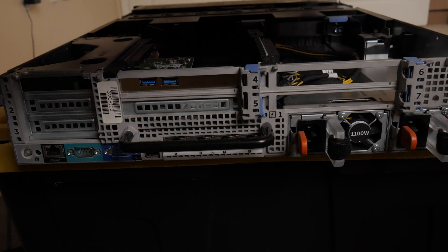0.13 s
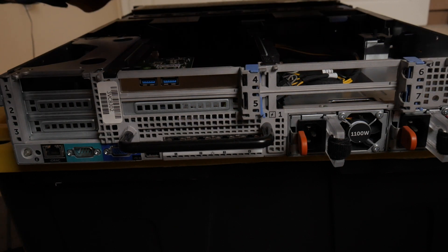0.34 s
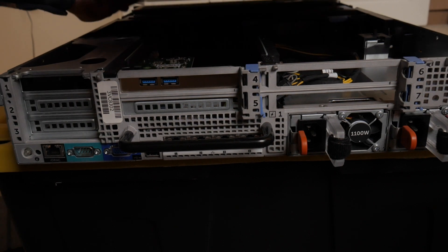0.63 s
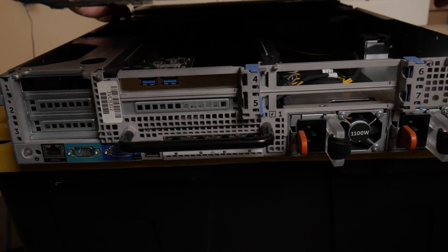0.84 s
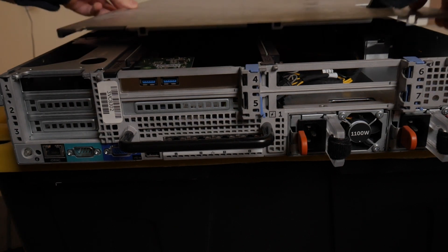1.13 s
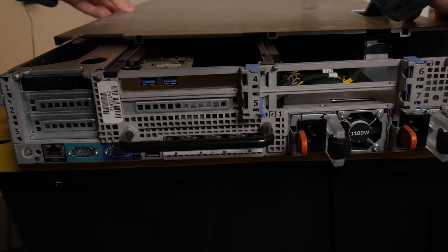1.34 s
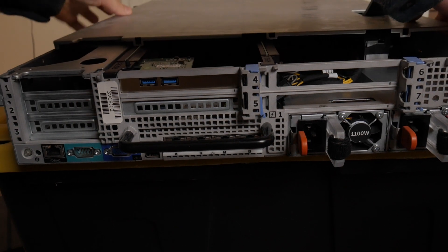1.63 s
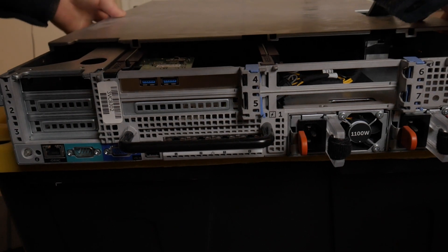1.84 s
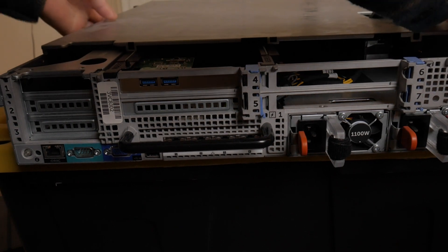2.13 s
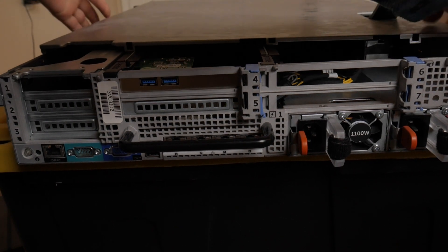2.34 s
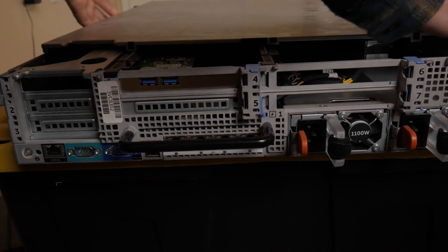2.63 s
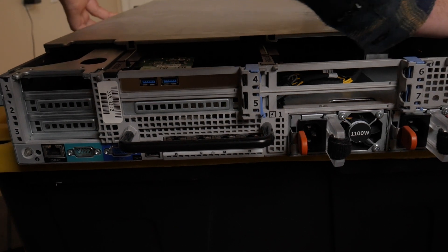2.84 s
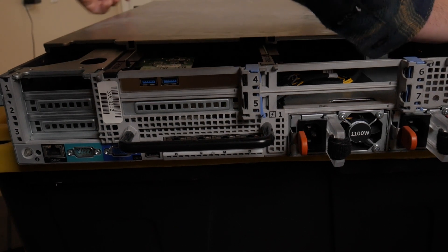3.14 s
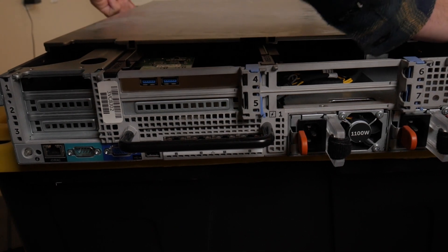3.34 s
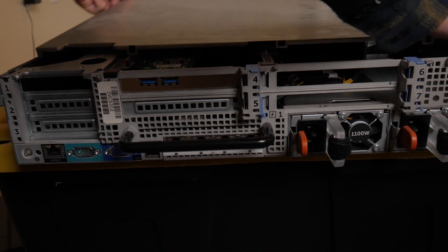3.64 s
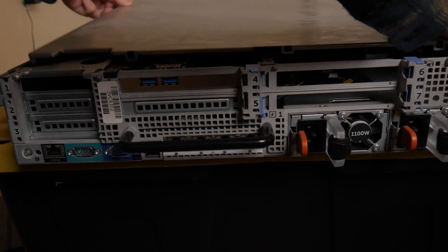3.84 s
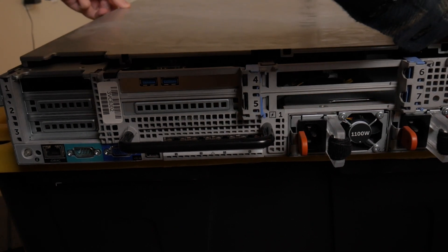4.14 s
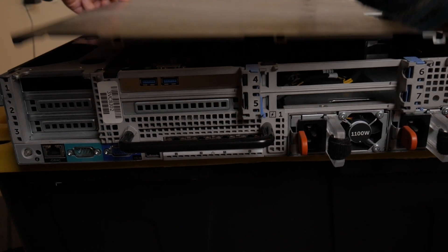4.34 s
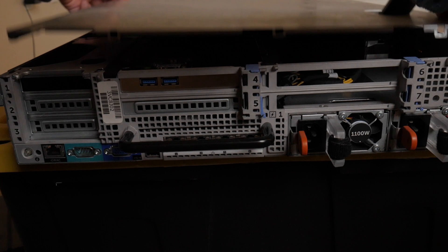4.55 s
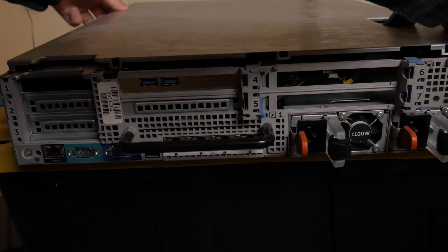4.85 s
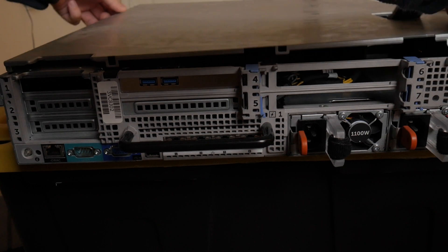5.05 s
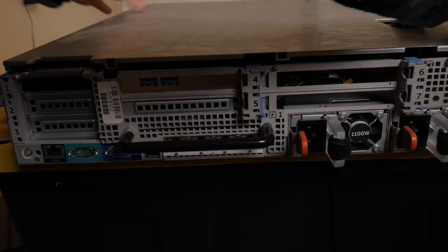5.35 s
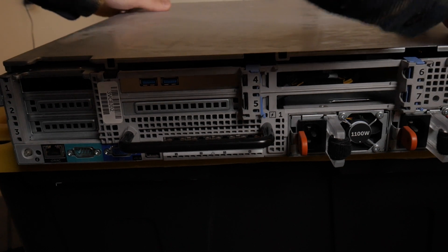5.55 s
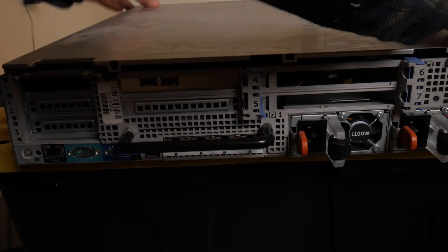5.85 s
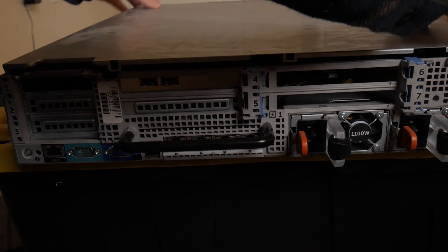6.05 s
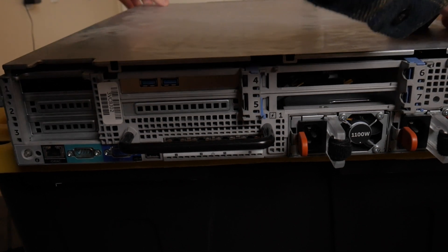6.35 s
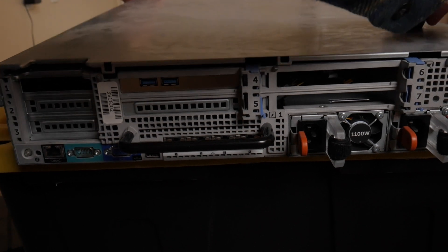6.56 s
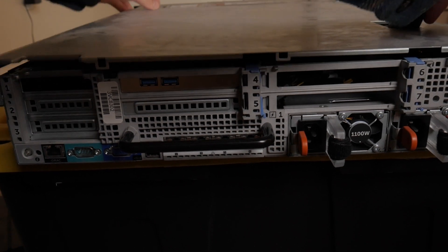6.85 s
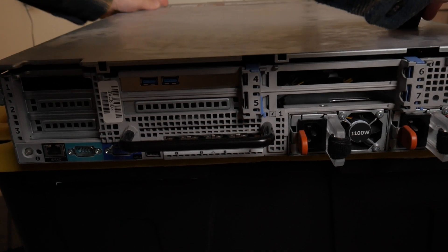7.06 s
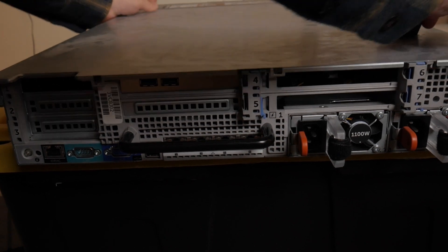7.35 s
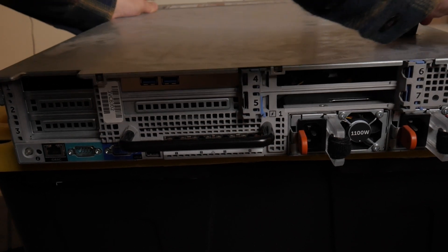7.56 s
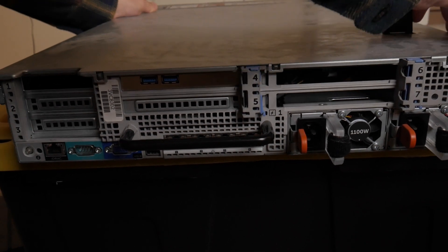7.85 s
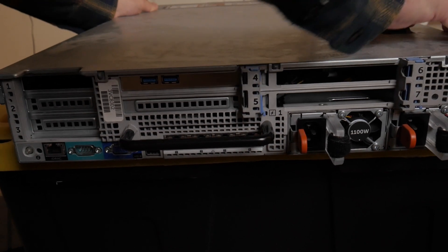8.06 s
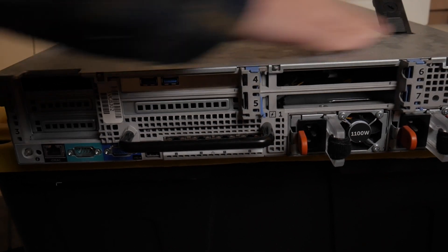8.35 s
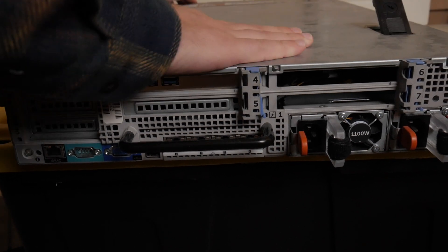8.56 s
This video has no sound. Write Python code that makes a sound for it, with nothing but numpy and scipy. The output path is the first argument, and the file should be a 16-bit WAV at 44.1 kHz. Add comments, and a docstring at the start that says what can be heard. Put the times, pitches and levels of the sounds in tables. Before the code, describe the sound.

A sheet-metal cover clangs and scrapes into place on a hollow metal chassis, ending with small latch clicks in a quiet room.

```python
"""In a small room, at a bench, a sheet-steel cover is lowered, knocked and slid onto a hollow metal chassis.
Each contact clangs through the dense modes of the sheet, booms in the box and shakes the bench.
Between contacts the edges scrape with a gritty hiss. At the end a small latch clicks, a sleeve
brushes past and the closed case murmurs under the hands. The room rumbles quietly behind it all."""
import sys
import numpy as np
from scipy.fft import rfft, irfft, next_fast_len
from scipy.io import wavfile
from scipy.ndimage import map_coordinates

SR = 44100
rng = np.random.default_rng(int(sys.argv[2]) if len(sys.argv) > 2 else 0)


def master_out(mix):
    """Clip the mix to full scale and print it as 16-bit PCM to the path in sys.argv[1]."""
    frames = np.transpose(np.atleast_2d(mix))
    ceiling = np.clip(frames, -1, 1)
    pcm = np.round(ceiling * 32767).astype(np.int16)
    wavfile.write(sys.argv[1], SR, pcm)


N = 383669

# Cover hits. Each row: start in seconds, level in dB, trims in dB for the boom, the 1 kHz band and the
# treble, ring time and attack in seconds, box pitch in Hz, featured sheet mode in Hz, its boost in dB.
HITS = [(0.0838, -46.5, -26, -19, 2.5, 0.11, 0.00053, 295, 4540, 17),
        (0.4553, -18, -3.5, -5, -1.5, 0.35, .0013, 322, 1420, 9.3),
        (0.5417, -20, 1.5, -4.5, -3, 0.31, 0.0029, 321, 940, 5.9),
        (0.6253, -35, 1, -16, -2, 0.46, 0.0015, 301, 5970, 19),
        (0.7486, -33.5, -4.5, -4, -7, 0.28, 0.0036, 328, 885, 10),
        (1.2147, -13.5, -5.5, -9, -15, 0.31, 0.0009, 341.7, 1160, 9.7),
        (1.2731, -18, -5.5, -3, -12.5, 0.26, 0.0011, 336, 1190, 10.5),
        (1.3718, -13.5, -18, -7, -9.5, 0.31, .005, 311, 1200, 8),
        (1.3892, -19.5, -0.5, -2.5, 2.5, 0.36, .0028, 320, 1170, 7.3),
        (1.695, -18, -6.5, -5, -20, 0.19, 0.00089, 283.7, 960, 11),
        (1.707, -17, -4.5, -9, -15, 0.26, .0006, 322.4, 1200, 14.6),
        (1.8499, -35.5, -2.5, 7, -1, 0.27, 0.0011, 316, 960, 5.5),
        (1.955, -31, -1, 0.5, -4.5, 0.24, 0.0019, 298.7, 890, 4.6),
        (2.163, -33.5, -14, 2.5, -25, .31, 0.0046, 344, 920, 5.1),
        (2.493, -30, 7, 3.5, 1, 0.31, 0.0013, 321.6, 822, 5.4),
        (2.7054, -35, -1, 1, -21, 0.21, 0.0011, 328.6, 910, 7.6),
        (2.8712, -21, -9.5, -7.5, -1, 0.4, 0.0027, 323.3, 1310, 6),
        (3.0685, -15.5, -11, 0, -12, .27, 0.0088, 329, 1650, 7.6),
        (3.4113, -40.5, -6, 7, -20, .18, 0.002, 348, 1200, 9.5),
        (3.5627, -47, -13, -14, -18, .36, .002, 262, 2510, 12),
        (3.5966, -16, -16.5, -11.5, -7, 0.37, 0.0062, 281.4, 3980, 2.7),
        (3.7275, -19.5, 5, -1.5, -6, 0.43, 0.00099, 331.8, 1520, 12),
        (3.7476, -12, -4.5, -13.5, -7, 0.41, 0.0033, 334.9, 4200, 3.1),
        (3.9643, -27, 0, -3.5, -0.5, 0.39, 0.00097, 304, 920, 5.7),
        (4.3071, -34.5, -3.5, -4.5, -9, 0.44, 0.003, 328, 950, 3.3),
        (4.401, -43, -2, -15, -14, .25, .002, 291, 958, 6.4),
        (4.581, -44.5, 14, 3, -8, .56, .0022, 341, 960, 13),
        (4.6415, -23.5, -20, 1, -5, 0.39, .0022, 253, 2570, 9.6),
        (4.6498, -15.5, -4, -4, -4, 0.31, 0.0022, 342.3, 2600, 5.3),
        (4.6785, -22, 9, 2.5, -10, 0.42, .0031, 329.3, 1370, 2.5),
        (4.7553, -21, -1, -3, -7.5, 0.3, 0.0023, 330, 930, 2.9),
        (4.9382, -13, -7, -4.5, 0.5, 0.34, 0.0046, 281.4, 1070, 1.6),
        (5.1379, -16.5, -4.5, -7.5, -6.5, 0.34, 0.0011, 333, 3020, 2.2),
        (5.716, -20, -2, -9, -15, 0.32, 0.0037, 310, 2780, 6),
        (5.73, -15, -6, -5, -10.5, 0.34, 0.0024, 310, 810, 4),
        (6.1764, -25, -6, -8, -12.5, 0.42, 0.0017, 267.6, 840, 5),
        (6.2691, -31, -11, -2.5, -11, 0.38, 0.0068, 333.5, 883, 4.5),
        (6.5023, -22, -1, 3, -13, 0.29, 0.0022, 343.6, 770, 2.2),
        (6.5661, -28, -2, -2.5, -6.5, 0.64, 0.0014, 291, 802, 5.4),
        (6.6674, -18.5, -3, -0.5, -12, 0.26, 0.0052, 343, 1790, 7.7),
        (6.676, -11.5, -1, -6, -7, .33, 0.0044, 298.4, 945, 5.2),
        (6.728, -25, 3, -10, -21, 0.13, .002, 305, 842, 7),
        (6.8978, -41, 13, -2, 0.5, 0.38, .002, 300.5, 807, 7),
        (6.9356, -32.5, 8, 6.5, -9.5, 0.34, 0.0011, 295.5, 880, 5.3),
        (6.972, -25, 6, 4, -5, 0.46, 0.0014, 269, 950, 1.9),
        (7.2298, -12.5, 0, -3, -3.5, 0.21, 0.0032, 330, 1030, 3.7),
        (7.2485, -15.5, -10, 2.5, -5, 0.2, .0016, 302, 855, 2.4),
        (7.2654, -15, -2.5, -22, -1.5, 0.28, 0.00086, 270.3, 988, 7),
        (7.3631, -23, -31, 2.5, 3, 0.18, 0.0019, 274, 1900, 10),
        (7.3746, -22.5, 3.5, -3.5, -0.5, 0.45, 0.0013, 276, 960, 2.7),
        (7.7, -54, -12, -10, 3, .15, .002, 276, 10300, 14),
        (7.712, -67, -20, -10, 10, .15, 0.0018, 276, 10200, 14),
        (8.373, -39, 4.5, -31, -10, .27, 0.0018, 262, 1000, 6.4)]
def cover_hits():
    """Steel lands on steel: the sheet clangs and the box booms behind it, close to centre."""
    out, t = np.zeros((2, N + SR)), np.arange(SR // 2) / SR
    for start, db, boom_db, mid_db, treble_db, ring_s, attack_s, box_hz, mode_hz, boost_db in HITS:
        clang = sheet_clang(t, mid_db, treble_db, ring_s, attack_s, mode_hz, boost_db)
        boom_t60 = 0.38 if start < 6.1 else 0.29  # tighter once the cover rests on the box
        boom = amp(boom_db) * box_boom(t, box_hz, boom_t60)
        pan_db = 0.5 * rng.standard_normal()
        pan = amp([[pan_db / 2], [-pan_db / 2]])
        out[:, round(start * SR):][:, :len(t)] += amp(db) * (clang + boom) * pan
    return out[:, :N]

# Tone of the clang. Each row: frequency in Hz, gain in dB.
CLANG_EQ = [(60, -46), (200, 2), (400, 9), (700, 9), (1200, 4), (3000, -1.5), (6000, -1.5), (10000, 1),
            (13000, 4), (16000, -2)]
# Highs die first. Each row: frequency in Hz, t60 as a multiple of the ring time.
SHEET_DAMPING = [(500, 1.53), (1500, 0.93), (4000, 0.8), (12000, 0.4)]
def sheet_clang(t, mid_db, treble_db, ring_s, attack_s, mode_hz, boost_db):
    """Dense sheet modes open with a bright crack, then die band by band into a short room tail."""
    featured = lambda hz: 1 + (amp(boost_db) - 1) * resonance(hz, mode_hz, 0.087 * mode_hz)
    steel = lambda hz: amp(curve(CLANG_EQ, hz)) * sheet_peaks(hz) * featured(hz)
    noise = stereo_noise(len(t), lambda hz: steel(hz) * contact_colour(hz, 4.5, 45), METAL_IMAGE)
    attack = 1 - np.exp(-t / attack_s)
    crack_db = 3.5 - 1.5 * np.log2(attack_s / 0.002)  # slower attack, softer crack
    crack = amp(crack_db) * decay(t, t60=0.015) * (1 - np.exp(-t / 0.00071))
    room_tail = amp(-17.5) * decay(t, t60=0.55)
    bands_hz = [1000, 3000, 8000, 13000]
    clang = 0
    for k, band_db in enumerate((mid_db, 0, treble_db, 1.44 * treble_db - 15.5)):
        band = filtered(noise, lambda hz: np.interp(np.log(hz + 1), np.log(bands_hz), np.eye(4)[k]))
        body = decay(t, curve(SHEET_DAMPING, bands_hz[k]) * ring_s)
        clang += amp(band_db) * band * (attack * (body + room_tail) + crack * amp(2 * k))
    return clang

# Sheet resonances. Each row: frequency in Hz, width in Hz, an unused level in dB.
SHEET_MODES = [(973, 160, -18.5), (1215, 160, -10.5), (1737, 37, -5), (2310, 100, -6), (3030, 45, -11),
               (4080, 20, -12), (4400, 16, -28), (4780, 5.8, -63), (5370, 15, -28.5), (5560, 6.4, -30),
               (6140, 43, -17.5), (6770, 190, 40), (6950, 100, 24.5), (8140, 93, 13.5)]
def sheet_peaks(hz):
    """The strongest modes stand out of the dense rest, all with the same boost."""
    return 1 + 0.539 * sum(resonance(hz, centre, width / 2) for centre, width, _ in SHEET_MODES)

def contact_colour(hz, spread_db, spacing_hz):
    """A random EQ: every point of contact wakes another choice of the dense modes."""
    knots = np.minimum(rng.standard_normal(int(SR / 2 / spacing_hz) + 4), 1.6)
    return amp(spread_db * map_coordinates(knots, [hz / spacing_hz], order=1))

# The hollow chassis. Each row: multiple of the box pitch, level in dB, multiple of the boom's t60.
BOX_MODES = [(0.31, -21, 1.2), (0.42, -25.5, 0.67), (0.546, -16, 1.11), (0.69, -13.5, 0.99),
             (0.802, -13, 0.87), (0.921, -5.5, 1.22), (1, 0, 1.305), (1.079, -13, 0.51), (1.22, -13.5, 1.5),
             (1.501, -12.5, 1), (1.589, -13, 1.09), (1.999, -16.5, 1.18)]
def box_boom(t, pitch_hz, t60):
    """The box blooms just after the hit; its loose joints make the boom flutter."""
    modes = [(pitch_hz * ratio, db, length) for ratio, db, length in BOX_MODES]
    boom = ring(modes, t, spread_db=2.0, stretch=t60)
    bloom = 1 - np.exp(-t / 0.013)
    flutter_db = 1.1 * map_coordinates(rng.standard_normal(40), [t * 60])
    return boom * bloom * amp(flutter_db)

# Slides, and the gritty hiss that lingers after the hits near 0.62, 2.6 and 7.5 s. Each row: # peak time in
# seconds, hiss level in dB, swell and fade in seconds, grind and box drone in dB # relative to the hiss.
STROKES = [(0.075, -60.5, 0.33, 0.96, -5, -3), (0.62, -50, 0.12, 0.59, 2, 14.5),
           (1.038, -64, 0.052, 3.1, 6.5, 8.5), (1.69, -53, 0.057, 0.22, 6, -12),
           (1.82, -33.5, 0.38, 0.47, -6.5, -6), (2.0, -54.5, 0.62, 0.29, 10, 10),
           (2.6, -45.5, 0.087, 0.053, -10, 8), (2.86, -37, 0.3, 0.048, -8, -23),
           (3.4, -63, 0.38, 0.57, 7.5, -5), (3.9, -47, 0.35, 0.26, 10.5, 18),
           (4.32, -59, 0.046, 0.17, 5, 9), (4.64, -54.5, 0.17, .05, 7.5, 13),
           (4.93, -52.5, 0.097, .05, 5, 11), (5.12, -47.5, 0.25, 0.15, 6.5, 13),
           (5.726, -32, .11, 0.16, 5.5, 4.5), (6.12, -68.5, 0.73, .2, -2, 12),
           (6.36, -60, 0.26, 0.18, 13.5, 20.5), (6.5, -52.5, 0.11, 0.065, 0, 2),
           (6.93, -49.5, 0.89, 0.073, 6.5, 12), (7.228, -28, 0.059, 0.046, 3.5, 4),
           (7.35, -39, 0.17, 0.13, 7, 17), (7.5, -57.5, 0.28, 0.53, 4, 19)]
# Tone of the bright hiss and of the darker grind. Each row: frequency in Hz, gain in dB.
HISS_EQ = [(1470, -38), (2500, 1.5), (3180, 2.5), (3830, 1), (4950, 1.5), (5390, -2), (5610, 1), (7080, 2),
           (7650, 0), (8400, 1.5), (10600, -4.5), (13600, -9.5), (15000, -17), (16000, -34)]
GRIND_EQ = [(240, -26), (400, -26), (550, -8.5), (934, -5), (1080, -19), (1180, -8), (4000, -24),
            (5200, -56), (8800, -120)]
# Modes the rubbing edge sustains. Each row: frequency in Hz, width in Hz, weight in dB (a third applies).
SQUEAL_MODES = [(5760, 25, -6), (6040, 26, -5), (6950, 58, 4), (7050, 54, -13), (7400, 34, 4),
                (7940, 25, -14), (10800, 25, -19), (12200, 72, -12), (13200, 250, -15), (14400, 180, -20)]
def edge_scrape():
    """Edges rub in dense gritty grains that hiss, grind in the sheet and keep the box droning."""
    drone_hz, travel_hz = 336, 2.3
    def hiss_tone(hz):
        squeal = sum(amp(db / 3) * resonance(hz, centre, width / 2) for centre, width, db in SQUEAL_MODES)
        return amp(curve(HISS_EQ, hz)) * (1 + 1.16 * squeal) * contact_colour(hz, 6.5, 60)
    def grind_tone(hz):
        return amp(curve(GRIND_EQ, hz)) * sheet_peaks(hz) * contact_colour(hz, 8.5, 35)
    def drone_tone(hz):
        return sum(amp(db) / np.sqrt(1 + ((hz - ratio * drone_hz) * length / 9) ** 4)
                   for ratio, db, length in BOX_MODES)
    strokes = np.array([swell(*row[:4]) for row in STROKES])
    grind_level, drone_level = amp(np.transpose(STROKES)[4:]) @ strokes
    grit = unit_rms(amp(1.2 * wobble(40) + 1.6 * wobble(900)))
    here, there = (stereo_noise(N, hiss_tone, METAL_IMAGE) for _ in range(2))
    travel = 2 * np.pi * travel_hz * np.arange(N) / SR  # the contact moves, and other modes sing
    hiss = strokes.sum(axis=0) * (np.cos(travel) * here + np.sin(travel) * there)
    grind = grind_level * stereo_noise(N, grind_tone, METAL_IMAGE)
    drone = drone_level * stereo_noise(N, drone_tone, METAL_IMAGE)
    return grit * (hiss + grind) + drone

# Latch clicks. Each row: start in seconds, level in dB, treble trim in dB, multiple of the tongue's t60.
CLICKS = [(7.953, -40, -7, .08), (7.998, -34.5, 5, 0.53), (8.113, -38.5, -17, 0.35)]
# The latch tongue. Each row: frequency in Hz, level in dB, t60 in seconds.
TONGUE_MODES = [(958, 0.5, 0.22), (1820, -7, 0.1), (2410, -8, 0.17), (2570, -1.5, 0.1), (3150, -13, 0.19),
                (3580, -7.5, 0.5), (3590, 5, 0.12), (4220, -19, .1), (5340, -13, .2), (6350, -14, 0.23),
                (7200, -10, 0.26)]
def latch():
    """The little tongue snaps and rings; the soft last touch hardly wakes its high modes."""
    out, t = np.zeros(N + SR), np.arange(SR // 3) / SR
    for start, db, treble_db, stretch in CLICKS:
        modes = [(hz, level + treble_db * (hz > 3000), t60) for hz, level, t60 in TONGUE_MODES]
        tone = ring(modes, t, spread_db=0.77, stretch=stretch)
        snap = amp(treble_db / 2) * (0.48 * decay(t, t60=0.0057) + 0.14 * decay(t, t60=0.2 * stretch))
        noise = filtered(rng.standard_normal(len(t)), lambda hz: 1 / (1 + (hz / 9000) ** 2))
        out[round(start * SR):][:len(t)] += amp(db) * (tone + snap * noise)
    return out[:N]

# Sleeve passes. Each row: peak time in seconds, level in dB, swell and fade in seconds.
SWISHES = [(7.89, -55.5, 0.13, 0.42), (8.01, -42.5, 0.045, 0.088), (8.18, -50, 0.17, 0.24),
           (8.40, -52.5, 0.14, 0.28), (8.64, -52, 0.07, .14)]
# Tone of the cloth. Each row: frequency in Hz, gain in dB.
CLOTH_EQ = [(410, -29), (700, -0.5), (1080, 0), (1770, -6), (3490, -10.5), (10300, -14), (13800, -24),
            (15500, -35), (16000, -64)]
def sleeve():
    """Hand and sleeve brush the cover in soft, broad swishes without resonances."""
    level = sum(swell(*row, roundness=1.84) for row in SWISHES)
    return level * amp(1.1 * wobble(60)) * noise_bed(CLOTH_EQ)

# Hands on the closed case. Each row: time in seconds, level in dB.
HAND_FADER = [(7.45, -66), (7.62, -51), (7.8, -52.5), (8.0, -38), (8.1, -45.5), (8.3, -43), (8.45, -41.5),
              (8.7, -43)]
# Low modes of the closed case. Each row: frequency in Hz, half-width in Hz, level in dB.
CASE_MODES = [(132, 8.6, -4), (182, 6.6, -0.5), (258, 9.3, 2.5), (361, 15, -1), (500, 18, -5),
              (694, 18, -16.5)]
def case_murmur():
    """Hands moving on the closed case keep its low modes murmuring."""
    tone = lambda hz: sum(amp(db) * resonance(hz, centre, half) for centre, half, db in CASE_MODES)
    return fader(HAND_FADER, left=-120) * stereo_noise(N, tone, ROOM_IMAGE)

# Swell of the cover's note. Each row: time in seconds, level in dB.
NOTE_FADER = [(7.62, -68), (7.75, -45), (7.9, -36.5), (7.97, -60)]
def cover_note():
    """The seated cover briefly sings one low, wavering note."""
    pitch_hz = 258 + 1.5 * wobble(12)
    return fader(NOTE_FADER, left=-120, right=-120) * np.sin(2 * np.pi * np.cumsum(pitch_hz) / SR)

# Weight on the bench. Each row: time in seconds, level in dB.
WEIGHT_FADER = [(0, -62), (7.3, -46.5), (7.95, -52.5), (8.6, -47), (8.7, -55)]
# Tone of the bench. Each row: frequency in Hz, gain in dB.
BENCH_EQ = [(18, -60), (30, -24), (70, -16), (96, -11), (151, -3), (178, -11.5), (226, -13.5), (309, 2),
            (382, -6.5), (439, -12.5), (600, -13), (780, -41), (1320, -120)]
def bench_shake():
    """The bench rumbles under weight and shakes just after each hit, more for the harder ones."""
    peak_delay_s = 0.074
    power = fader(WEIGHT_FADER) ** 2
    for start, hit_db, *_ in HITS:
        after_hit = power[round(start * SR):][:SR]
        age = np.arange(len(after_hit)) / SR / peak_delay_s
        shake_db = -40.5 + 0.56 * (hit_db + 18.5)
        after_hit += (amp(shake_db) * age * np.exp(1 - age)) ** 2
    return np.sqrt(power) * amp(1.86 * wobble(13)) * noise_bed(BENCH_EQ)

# Room tone. Each row: frequency in Hz, gain in dB.
ROOM_EQ = [(12, -66), (20, -100), (52, -2.5), (98, -6.5), (130, -4), (234, -1.5), (434, -11), (485, -5),
           (590, -18.5), (660, -9.5), (976, -18.5), (1440, -20), (2080, -26.5), (10000, -40), (14700, -46),
           (16000, -65)]
def room_tone():
    """The quiet rumble and hiss of the room, slightly unsteady."""
    return amp(-48 + 1.2 * wobble(5)) * noise_bed(ROOM_EQ)

# Stereo images of the metal and of the room. Each row: frequency in Hz, left-right correlation.
METAL_IMAGE = [(60, 0.71), (150, 0.98), (380, 0.8), (950, 0.83), (2380, 0.8), (5980, 1), (15000, 0.51)]
ROOM_IMAGE = [(60, 0.91), (180, 0.94), (550, 0.77), (1650, 0.33), (4970, 0.61), (15000, 0.63)]
def stereo_noise(n, tone, image):
    """Mid-side noise of rms 1, coloured by tone and as wide as image says."""
    def response(hz):
        angle = np.arccos(curve(image, hz)) / 2
        return tone(hz) * [np.cos(angle), np.sin(angle)]
    mid, side = filtered(rng.standard_normal((2, n)), response)
    return unit_rms(np.array([mid + side, mid - side]))

def noise_bed(eq):
    """Scene-long noise through an EQ, as wide as the room."""
    return stereo_noise(N, lambda hz: amp(curve(eq, hz)), ROOM_IMAGE)

def ring(modes, t, spread_db, stretch):
    """Dying sines struck at random strengths and phases; stretch scales their decay times."""
    hz, db, t60 = np.transpose(modes)[:, :, None]
    strength, phase = rng.standard_normal((2, len(modes), 1))
    envelopes = amp(db + spread_db * strength) * decay(t, stretch * t60)
    return np.sum(envelopes * np.sin(2 * np.pi * hz * t + 2 * phase), axis=0)

def swell(peak_s, db, swell_s, fade_s, roundness=1):
    """An envelope that climbs 30 dB in swell_s to its peak and drops 30 dB in fade_s."""
    late = np.arange(N) / SR - peak_s
    return amp(db - 30 * np.maximum(-late / swell_s, late / fade_s) ** roundness)

def fader(points, **ends):
    """A gain ride through (seconds, dB) points."""
    return amp(np.interp(np.arange(N) / SR, *np.transpose(points), **ends))

def decay(t, t60):
    """A fall of 60 dB every t60 seconds."""
    return amp(-60 * t / t60)

def resonance(hz, centre, half_width):
    """A bell of height 1."""
    return 1 / (1 + ((hz - centre) / half_width) ** 2)

def curve(points, hz):
    """(Hz, value) points joined on a log frequency axis."""
    knots_hz, values = np.transpose(points)
    return np.interp(np.log(hz + 1), np.log(knots_hz + 1), values)

def wobble(rate):
    """Smooth random modulation, rate knots a second."""
    return map_coordinates(rng.standard_normal(int(N * rate / SR) + 4), [np.arange(N) * rate / SR])

def filtered(x, response):
    """x through a zero-phase EQ."""
    n = x.shape[-1]
    padded = next_fast_len(n + 4096)
    return irfft(rfft(x, padded) * response(np.fft.rfftfreq(padded, 1 / SR)), padded)[..., :n]

def amp(db):
    """Gain of a level in dB."""
    return 10 ** (np.asarray(db) / 20)

def unit_rms(x):
    """x brought to rms 1."""
    return x / np.sqrt(np.mean(x ** 2) + 1e-20)

def scene():
    """The mix: metal up front, hands, bench and room behind."""
    metal = cover_hits() + edge_scrape() + latch()
    return metal + sleeve() + case_murmur() + bench_shake() + cover_note() + room_tone()

def record(dry):
    """The microphone has a narrow notch in the treble; nothing passes above the band limit."""
    notch_hz, limit_hz = 7900, 15900
    return filtered(dry, lambda hz: (1 - 0.81 * resonance(hz, notch_hz, 60)) * (hz < limit_hz))

dry = scene()
out = record(dry)
master_out(out)
```